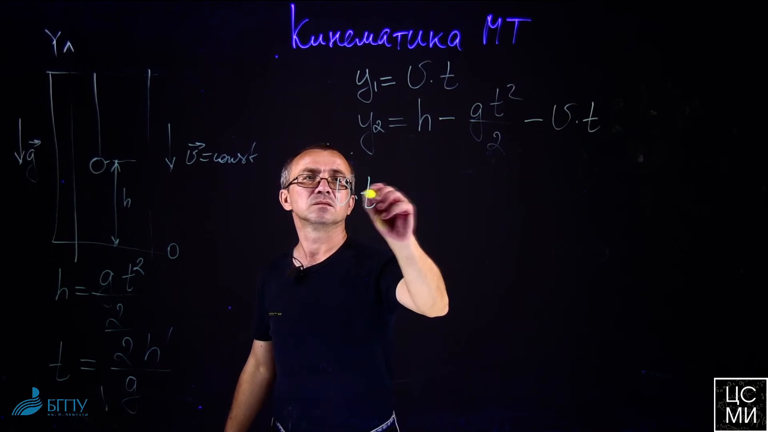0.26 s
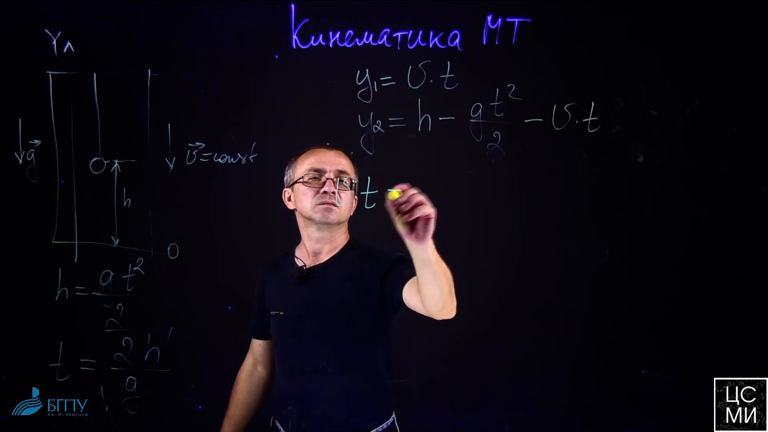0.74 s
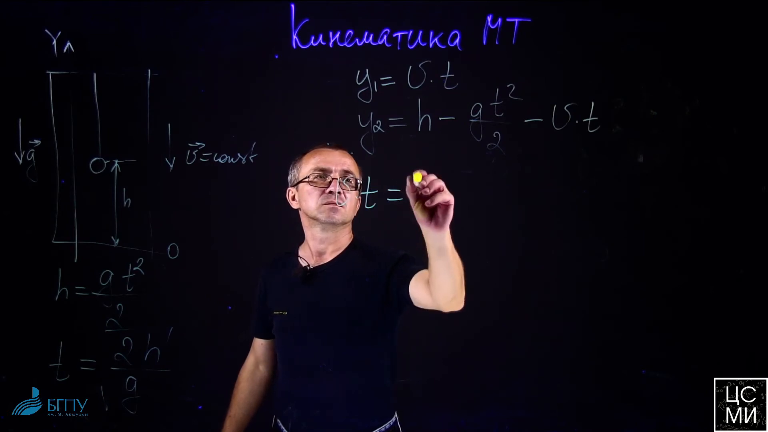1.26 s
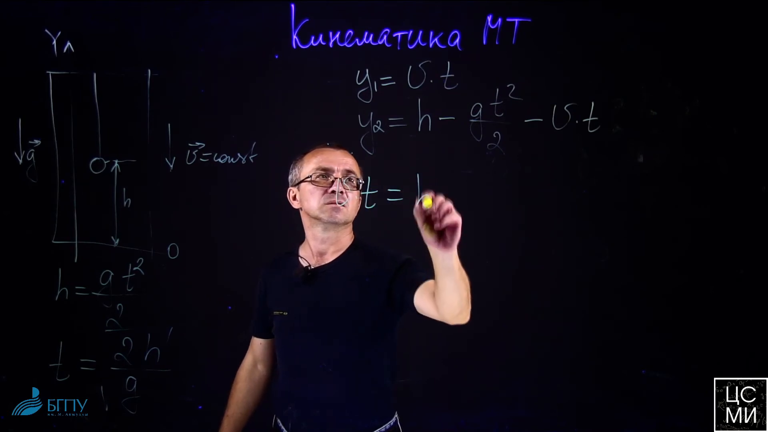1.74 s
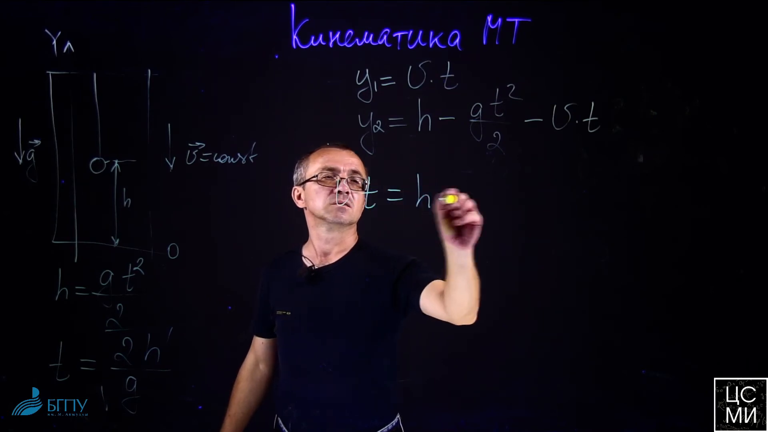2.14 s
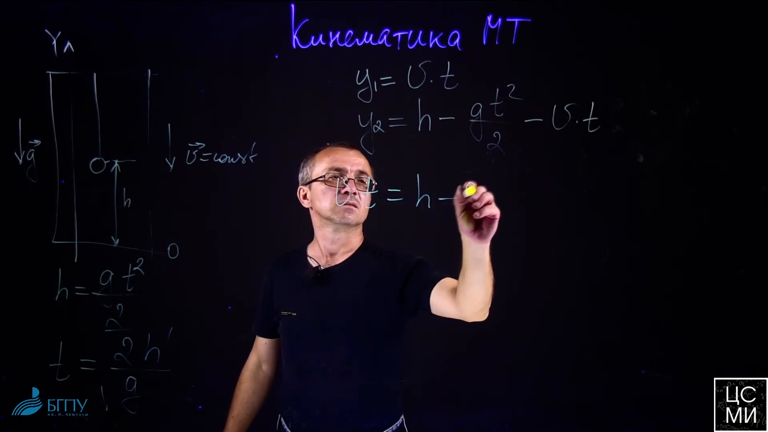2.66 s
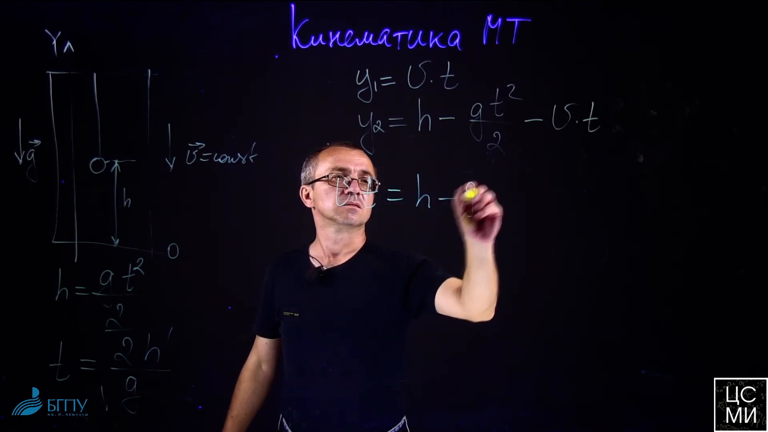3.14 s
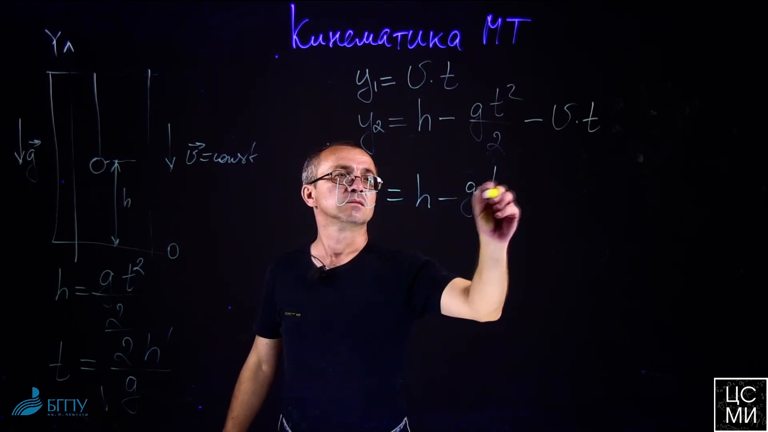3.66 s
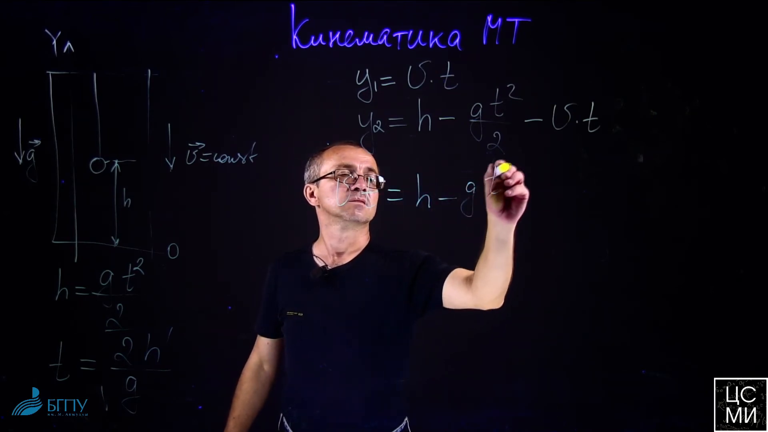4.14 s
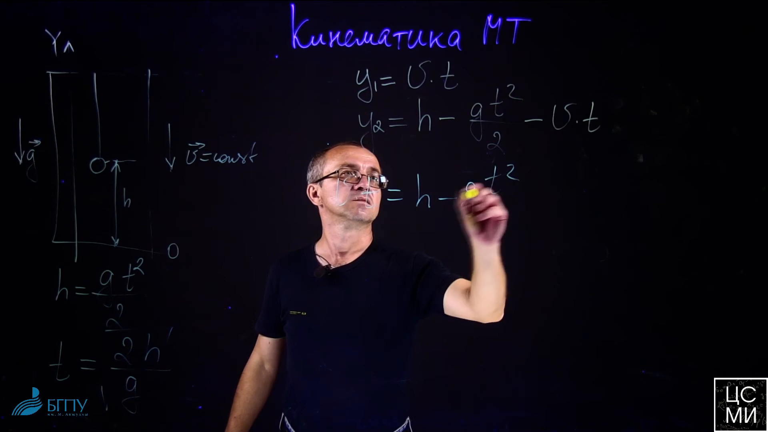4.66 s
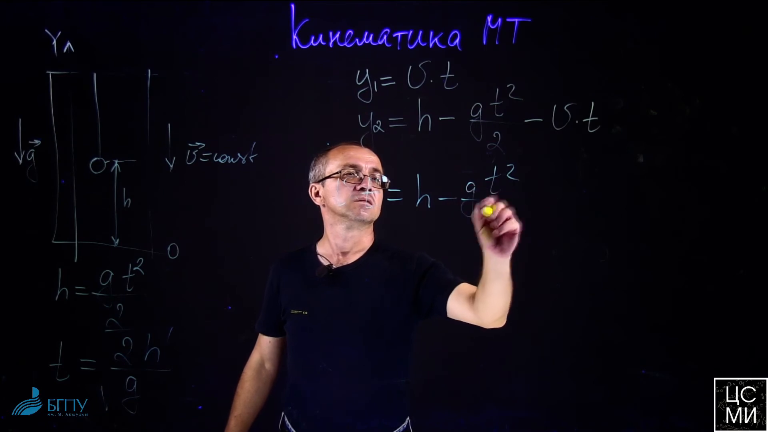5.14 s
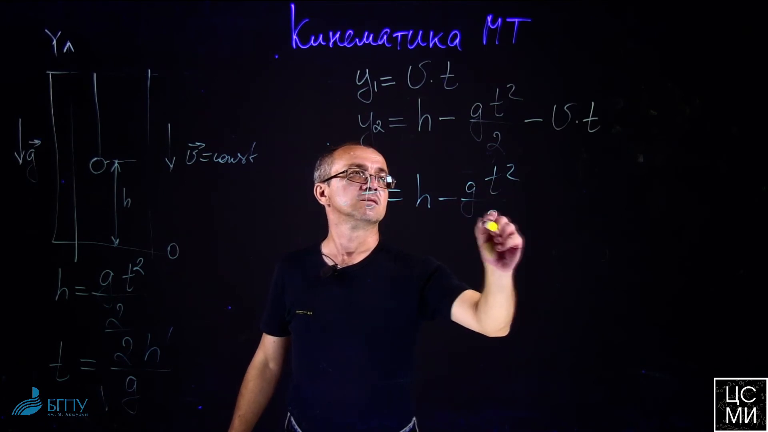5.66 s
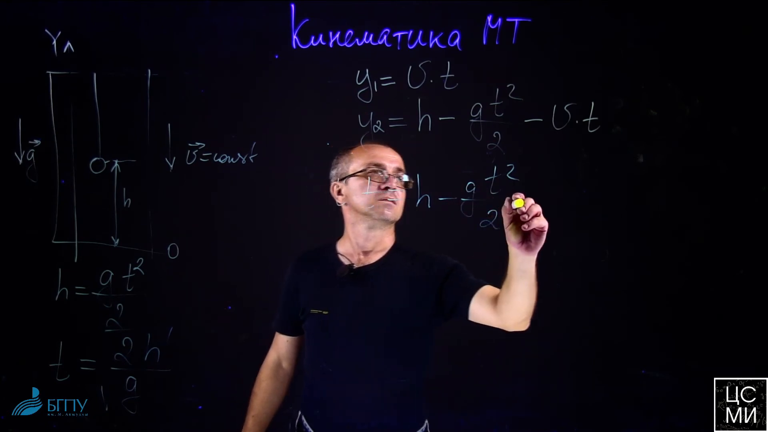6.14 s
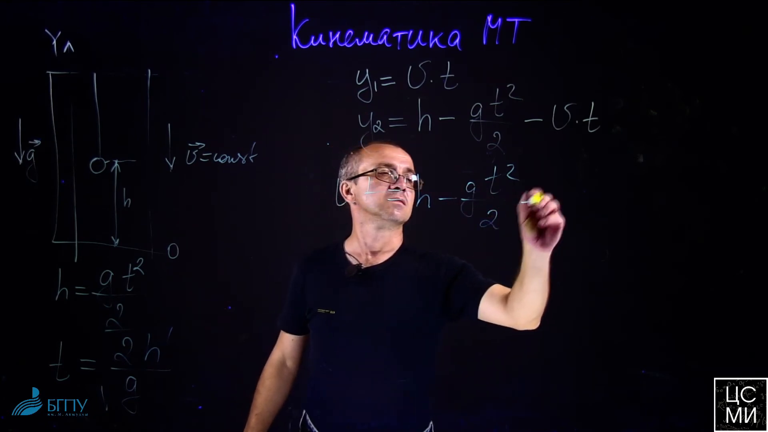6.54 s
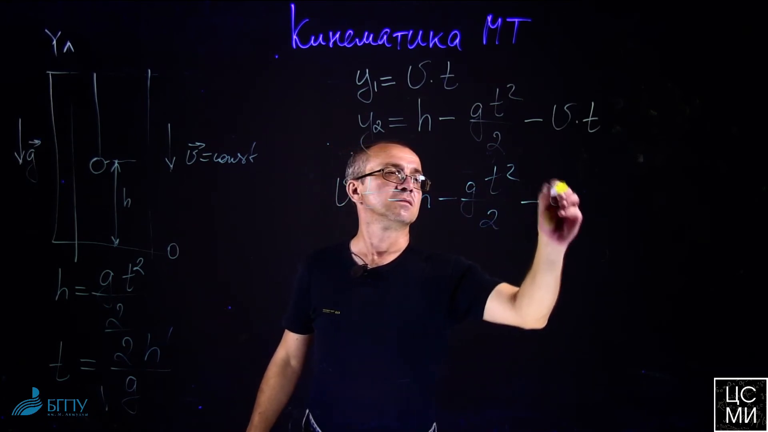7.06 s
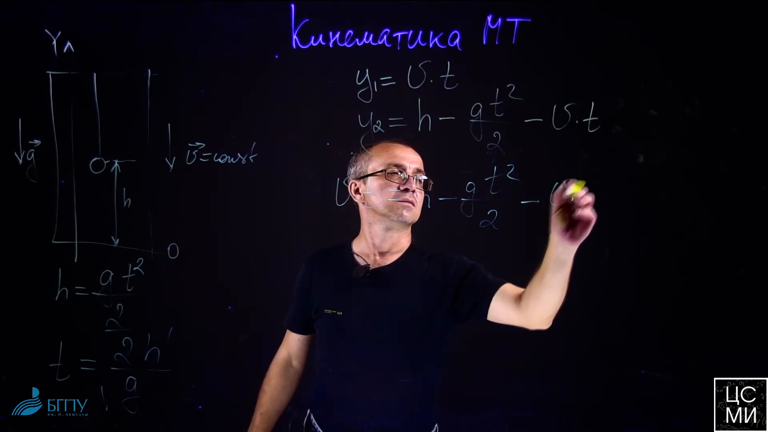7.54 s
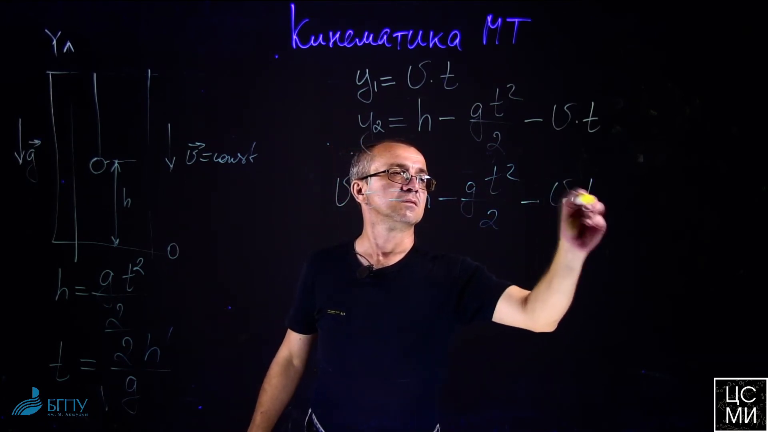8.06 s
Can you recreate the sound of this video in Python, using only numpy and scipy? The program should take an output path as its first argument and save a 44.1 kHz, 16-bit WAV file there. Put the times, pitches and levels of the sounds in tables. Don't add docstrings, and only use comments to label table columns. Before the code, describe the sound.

From 0 s, a felt marker writes on a glass board in a bare, echoing studio over quiet ventilation hum and faint hiss. A soft dull knock marks the first landing, then faint thin squeaks waver and fall, with a brighter burst near 0.8 s. From 1.2 to 1.7 s longer squeaks drag downward and turn rough and low. A wavering bar follows at about 2 s, then curving squeaks from 2.3 to 3 s. After a tap at 3.2 s, strokes become louder, with a sharp rising squeak at 4.25 s and a short falling chirp at 4.85 s. Wavering curves fill 5.1 to 5.55 s. A muted tap comes at 5.8 s, a short squeak at 6.2 s, then dips and leaps around 6.6-7 s. Knocks lead into piercing rising squeaks at 7.8 and 8.1 s, the loudest, ending in a tiny high chirp and echo. Loud squeaks carry faint low thumps.

```python
import sys
import numpy as np
from scipy import signal
from scipy.fft import rfft, irfft, next_fast_len
from scipy.io import wavfile
from scipy.ndimage import uniform_filter1d, map_coordinates

SR = 44100
rng = np.random.default_rng(int(sys.argv[2]) if len(sys.argv) > 2 else 0)


def invert_db(level):
    return 10 ** (np.asarray(level, dtype=float) / 20)


def dump_mix(stems):
    frames = np.atleast_2d(stems).T
    limited = np.clip(frames, -1, 1)
    pcm = np.round(limited * 32767).astype(np.int16)
    wavfile.write(sys.argv[1], SR, pcm)


N = 366471

# frequency in Hz, level in dB.
OVERTONES = [(2500, 24), (4100, 4), (5500, -1), (8000, 7.5), (11000, 3.5), (14000, -3.5), (16000, -1)]
# time in seconds, peak level in dB, tick level relative to the knock in dB.
LANDINGS = [(0.043, -42, -29), (0.391, -42.5, -38), (0.709, -40.5, -27), (1.125, -39, -31),
            (1.879, -42.5, -34), (2.296, -39.5, -27), (3.218, -40.5, -28), (3.71, -37.5, -27.5),
            (3.982, -38.5, -28), (4.315, -51, -30), (4.625, -43, -33), (5.048, -39.5, -37),
            (5.546, -53, -30), (5.817, -46, -24), (6.546, -38.5, -28), (7.206, -36, -17),
            (7.496, -40.5, -23.5), (8.013, -39, -32), (8.178, -42.5, -26)]
# frequency in Hz, level in dB, time to fade by 60 dB in seconds.
PANE_LOW = [(110.3, -11, 0.31), (154.4, -4, 0.55), (172.5, 0, 0.13), (201.7, -0.5, 0.079), (225, 0, 0.093)]
PANE_HIGH = [(271, 1, 0.071), (342, 1, 0.044), (401, -3.5, 0.045), (511.5, -1.5, 0.041), (687, -9, 0.034),
             (865, -10.5, 0.028)]
# frequency in Hz, level in dB per Hz.
AIR = [(35, -58), (60, -5), (96, -1), (215, -3.5), (368, -8), (509, -9), (688, -9.5), (849, -9.5),
       (2410, -25), (2650, -25), (3050, -29.5), (5200, -34.5), (15500, -39.5)]
# frequency in Hz, time to fade by 60 dB in seconds.
STUDIO = [(150, 0.5), (1000, 0.8), (2700, 0.75), (6000, 0.68), (9000, 0.53), (14000, 0.28)]
# frequency in Hz, echo level in dB.
WETNESS = [(150, 6), (2700, 2), (6000, -1.5), (9000, -7), (14000, 0)]
# time in seconds, slip rate in Hz (set by hand speed), level
# in dB.
LETTER_T = [
    [(0.0, 2290, -67), (0.01, 2330, -68)],
    [(0.012, 2900, -67), (0.03, 3130, -75)],
    [(0.095, 3040, -55.5), (0.13, 2942, -48.5), (0.2, 2885, -48.5), (0.24, 2850, -75)],
    [(0.413, 2726, -55), (0.432, 2898, -56), (0.455, 2875, -52), (0.49, 2720, -51.5), (0.53, 2716, -54)],
    [(0.74, 2560, -49.5), (0.76, 2810, -56), (0.785, 2923, -43.5), (0.825, 2900, -49.5), (0.837, 3080, -58)],
]
LETTER_H = [
    [(1.165, 2830, -62), (1.18, 3000, -56), (1.195, 3180, -58), (1.23, 3190, -64)],
    [(1.2, 2890, -64), (1.22, 2606, -52.5), (1.335, 2368, -47), (1.345, 2150, -52), (1.362, 1700, -66)],
    [(1.445, 3110, -68), (1.5, 2763, -52), (1.55, 2420, -52), (1.57, 2183, -68), (1.59, 2414, -55),
     (1.618, 2427, -51)],
    [(1.622, 2336, -60), (1.643, 2235, -56), (1.652, 2033, -57), (1.676, 1930, -60.5), (1.695, 2028, -57.5)],
]
MINUS = [
    [(1.935, 2434, -60), (1.96, 2618, -51.5), (1.985, 2662, -49), (1.994, 2347, -45), (2.02, 2560, -50),
     (2.045, 2632, -48.5), (2.06, 2130, -53.5)],
]
LETTER_G = [
    [(2.325, 2927, -56), (2.39, 2920, -53), (2.425, 2840, -55), (2.46, 2510, -55.5), (2.5, 2624, -53),
     (2.575, 2708, -47.5)],
    [(2.645, 2850, -58), (2.66, 2710, -52), (2.675, 3100, -59)],
    [(2.715, 2884, -51.5), (2.76, 2737, -43.5), (2.785, 2475, -54.5), (2.847, 3257, -52),
     (2.885, 3185, -53.5)],
    [(2.89, 3050, -50), (2.93, 2950, -54), (2.97, 2775, -49), (3.0, 2890, -65)],
]
SECOND_T = [
    [(3.325, 3320, -67), (3.346, 3150, -63), (3.36, 2770, -52.5), (3.41, 2660, -49.5), (3.44, 2490, -51.5),
     (3.455, 1915, -60.5), (3.47, 1920, -66)],
    [(3.482, 2347, -53), (3.496, 2663, -45), (3.53, 2733, -42)],
    [(3.74, 2376, -63), (3.755, 2610, -47.5), (3.775, 2647, -40), (3.795, 2670, -45.5), (3.82, 2719, -42.5)],
]
RAISED_TWO = [
    [(4.0, 2250, -57), (4.012, 2600, -50), (4.045, 2560, -43), (4.065, 2557, -47), (4.09, 2640, -67)],
    [(4.115, 2755, -66), (4.14, 2910, -54.5), (4.165, 3010, -45.5), (4.19, 2795, -51), (4.205, 2260, -70)],
    [(4.218, 1974, -54), (4.238, 2100, -50), (4.268, 2926, -35), (4.28, 3000, -40.5), (4.3, 2974, -41),
     (4.315, 2270, -44.5)],
]
BAR = [
    [(4.675, 2805, -56), (4.725, 2872, -43), (4.735, 2575, -48.5), (4.765, 3234, -49)],
    [(4.852, 2480, -36), (4.864, 2200, -44)],
]
LOWER_TWO = [
    [(5.1, 3224, -60.5), (5.15, 2760, -56), (5.185, 2490, -47.5), (5.2, 2740, -68), (5.23, 2879, -56),
     (5.255, 2645, -45), (5.275, 2714, -49), (5.315, 2670, -39), (5.34, 2440, -50)],
    [(5.385, 2980, -53), (5.43, 2904, -50), (5.475, 2112, -46), (5.495, 2700, -46), (5.52, 3175, -46.5),
     (5.535, 2940, -44.5)],
    [(5.546, 2225, -39), (5.556, 2000, -46)],
]
DASH = [
    [(6.163, 2280, -59), (6.175, 2441, -43.5), (6.195, 2539, -43.5), (6.23, 2467, -46.5),
     (6.265, 2363, -42.5), (6.283, 2220, -54), (6.295, 1900, -66)],
]
LETTER_V = [
    [(6.64, 3350, -50.5), (6.652, 3050, -53), (6.665, 2730, -47), (6.72, 2450, -51), (6.77, 2365, -50),
     (6.785, 2400, -43), (6.81, 2565, -44), (6.835, 2540, -42), (6.865, 2720, -48)],
    [(6.9, 3040, -45), (6.942, 2685, -45.5), (6.952, 2300, -50), (6.964, 1593, -50)],
    [(6.985, 2010, -35), (6.99, 2940, -37), (7.015, 2783, -44), (7.022, 2420, -41), (7.036, 2390, -42)],
    [(7.23, 2335, -66), (7.242, 2285, -50)],
]
LAST_T = [
    [(7.542, 2700, -65), (7.564, 3095, -48.5)],
    [(7.587, 2790, -52), (7.66, 2623, -44.5), (7.697, 2494, -54), (7.735, 1475, -62), (7.776, 2677, -37.5),
     (7.8, 2990, -29.5), (7.815, 3250, -37), (7.835, 3220, -50.5), (7.855, 2440, -38)],
    [(8.066, 2506, -54), (8.095, 2285, -42), (8.124, 2930, -28), (8.136, 3150, -30), (8.142, 3400, -40)],
    [(8.142, 4050, -42), (8.155, 4110, -49)],
]
# the sign, then for each stroke its overtone level in dB at middle level and the
# abruptness of the slip in dB per overtone.
WRITING = [(LETTER_T, [(-26, -9), (-30, -5), (-16, -5.5), (-15.5, -7), (-16, -6)]), (LETTER_H, [(-24, -2),
           (-14.5, -2), (-18, -5), (-10.5, -7)]), (MINUS, [(-14, -4)]), (LETTER_G, [(-20, -5.5),
           (-19.5, -3.5), (-19.5, -5.5), (-13, -3)]), (SECOND_T, [(-14, -4), (-16, -5.5), (-15, -.4)]),
           (RAISED_TWO, [(-23, -2.5), (-19.5, -2.5), (-14.5, -4.5)]), (BAR, [(-16, -4), (-20, -.6)]),
           (LOWER_TWO, [(-19.5, -4.5), (-16, -4.5), (-13, -2)]), (DASH, [(-15, -7)]),
           (LETTER_V, [(-16, -3.5), (-20.5, -8.5), (-21, -5), (-18, -10)]), (LAST_T, [(-32, -4),
           (-14, -2.5), (-10, -1.9), (-22, -8)])]

MIDDLE_DB, MIDDLE_HZ, NIB_HZ = -50, 2700, 3500
PURER_PER_DB, PURER_DB_PER_OCTAVE = 0.39, 7
LIFT_DB, LIFT_S = 3, 0.03
SMEAR_DB = 1.5
SKID_HZ, SKID_DB_PER_HZ, SKID_MOST_DB = 3050, 0.055, 16
UPPER_DB, UPPER_YIELDS = -10, 0.41
AIR_DB, RUMBLE_DB = -60, -66
LEAK_DB, LEAK_POWER, LEAK_LOW_HZ, LEAK_HIGH_HZ = -8.5, 0.72, 7, 49


def unit(x):
    return x / np.sqrt(np.mean(x ** 2) + 1e-20)


def along(points, hz):
    f, v = np.transpose(points)
    return np.interp(np.log(hz + 1), np.log(f + 1), v)


def wobble(size, rate):
    knots = rng.standard_normal(int(size * rate / SR) + 4)
    return map_coordinates(knots, [np.arange(size) * rate / SR])


def coloured(gain):
    m = next_fast_len(N + 8192)
    spectrum = rfft(rng.standard_normal(N), m) * gain(np.fft.rfftfreq(m, 1 / SR))
    return unit(irfft(spectrum, m)[:N])


def add(track, s, sound):
    part = track[max(round(s * SR), 0):][:len(sound)]
    part += sound[:len(part)]


def room(x, wet_db, early_db):
    hz, t, z = signal.stft(rng.standard_normal(SR), SR, nperseg=256)
    fade_db = along(WETNESS, hz)[:, None] - 60 * t / along(STUDIO, hz)[:, None]
    tail = signal.istft(z * invert_db(fade_db), SR, nperseg=256)[1]
    tail = tail * np.clip(np.arange(len(tail)) / SR / 0.0021, 0, 1)
    tail = invert_db(wet_db) * tail / np.linalg.norm(tail)
    walls = (rng.uniform(0.1, 1, size=8) * 0.025 * SR).astype(int)
    tail[walls] += invert_db(early_db) * rng.standard_normal(size=8)
    tail[0] = 1
    return signal.fftconvolve(x, tail)


def air():
    drift_db = 0.6 * wobble(N, 3)
    hum = coloured(lambda hz: invert_db(along([(25, -22.5), *AIR], hz)))
    rumble_curve = [(2, -17), (8, 9), (20, -5.5), (38, 2.0), (60, -8.0), (90, -40), (200, -91)]  # Hz, dB
    rumble = coloured(lambda hz: invert_db(along(rumble_curve, hz)))
    return invert_db(AIR_DB + drift_db) * hum + invert_db(RUMBLE_DB) * rumble


def felt(size):
    band = signal.butter(2, [600, 4200], "bandpass", fs=SR)
    return unit(signal.lfilter(*band, rng.standard_normal(size)))


def squeak(rows, bright_db, sharp_db):
    s, *cols = np.transpose(rows)
    t = np.arange(s[0], s[-1] + 0.0018, 1 / SR)
    hz, db = (uniform_filter1d(np.interp(t, s, c), size=240, mode="nearest") for c in cols)

    over_db = bright_db - PURER_PER_DB * (db - MIDDLE_DB) - PURER_DB_PER_OCTAVE * np.log2(hz / MIDDLE_HZ)
    if hz.min() < NIB_HZ:
        over_db = over_db - np.clip(SKID_DB_PER_HZ * (hz - SKID_HZ), 0, SKID_MOST_DB)
    over_db = over_db - LIFT_DB * np.clip(1 - (t[-1] - t) / LIFT_S, 0, 1)

    fast_turn = np.abs(np.gradient(np.log(hz)) * SR) / 15
    slow_drag = np.clip(1 - hz / 2150, 0, 1) * 4
    unrest = np.clip(fast_turn + slow_drag, 0, 1)
    hz = hz * (1 + 0.003 * wobble(len(t), 150) + 0.028 * unrest ** 2 * wobble(len(t), 400))
    phase = 2 * np.pi * np.cumsum(hz) / SR

    k = np.arange(2, 10)[:, None]
    start = rng.uniform(0, 2 * np.pi, k.shape)
    flutter_db = 1.85 * np.array([wobble(len(t), 98.4) for _ in k])
    slope_db = (sharp_db - 4.6 * unrest) * (k - 2.5)
    gains = invert_db(over_db - SMEAR_DB * unrest + slope_db + along(OVERTONES, k * hz) + flutter_db)
    gains = gains * (k * hz < SR / 2)
    tone = np.sin(phase) + np.sum(gains * np.sin(k * phase + start), axis=0)

    rub = invert_db(-52 + 32 * unrest) * felt(len(t))
    grip = np.clip((t - t[0]) / 0.0025, 0, 1) * np.clip((t[-1] - t) / 0.0014, 0, 1)
    level_db = db + (2.0 + 1.4 * unrest) * wobble(len(t), 118.8)
    return np.sqrt(2) * invert_db(level_db) * grip * (tone + rub)


def marker():
    track = np.zeros(N)
    for sign, feel in WRITING:
        for rows, (bright_db, sharp_db) in zip(sign, feel):
            stroke = squeak(rows, bright_db, sharp_db)
            add(track, rows[0][0], room(stroke, wet_db=-3.0, early_db=-16))
    return track


def ring(modes, t):
    total = np.zeros(len(t))
    for hz, db, t60 in modes:
        total += invert_db(db + rng.normal(0, 1.45) - 60 * t / t60) * np.sin(2 * np.pi * hz * t)
    return total * (1 - np.exp(-t / 0.0017))


def landings():
    track, t = np.zeros(N), np.arange(SR // 2) / SR
    for s, db, tick_db in LANDINGS:
        upper_db = UPPER_DB - UPPER_YIELDS * (db + 41.5)
        tick = invert_db(tick_db + 2.5 - 60 * t / 0.079) * felt(len(t)) * (t > 0.0015)
        knock = invert_db(-9.0) * ring(PANE_LOW, t) + invert_db(upper_db + 6.5) * ring(PANE_HIGH, t) + tick
        add(track, s + 0.0015, invert_db(db) * room(knock, wet_db=-6.5, early_db=-16.5))
    return track


def leak(x):
    treble = signal.sosfilt(signal.butter(4, 1500, "highpass", fs=SR, output="sos"), x)
    loudness = np.abs(treble) ** LEAK_POWER
    push = signal.sosfilt(signal.butter(2, LEAK_LOW_HZ, "highpass", fs=SR, output="sos"), loudness)
    return invert_db(LEAK_DB) * signal.sosfilt(signal.butter(2, LEAK_HIGH_HZ, fs=SR, output="sos"), push)


def scene():
    return (marker() + landings() + air())[None]


def band_limit(x):
    return signal.sosfilt(signal.butter(12, 15710, fs=SR, output="sos"), x)


def record(dry):
    mix = dry + leak(dry)
    return band_limit(mix)


dry = scene()
out = record(dry)
dump_mix(out)
```